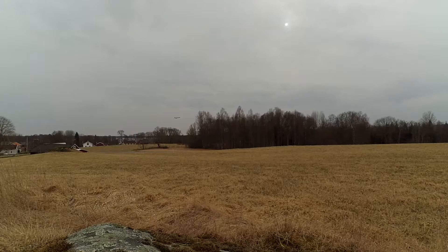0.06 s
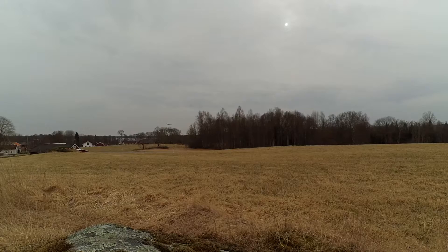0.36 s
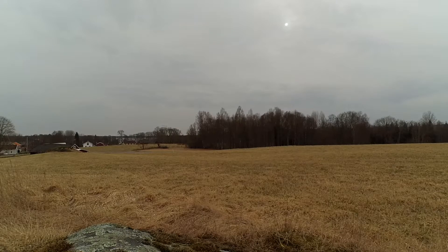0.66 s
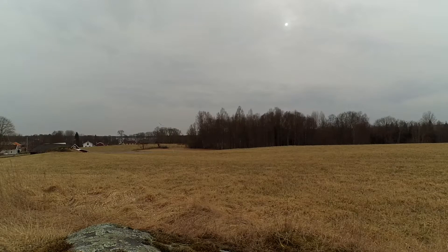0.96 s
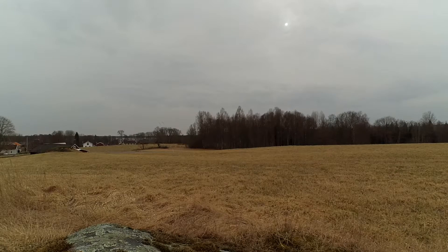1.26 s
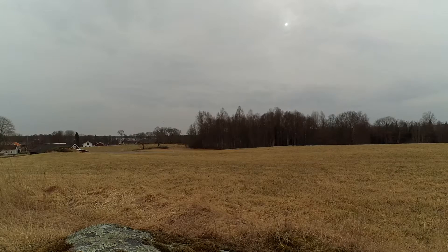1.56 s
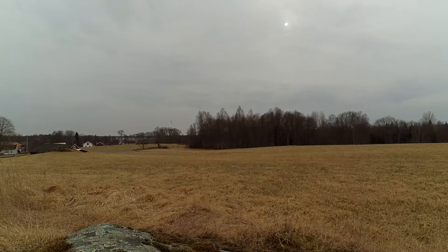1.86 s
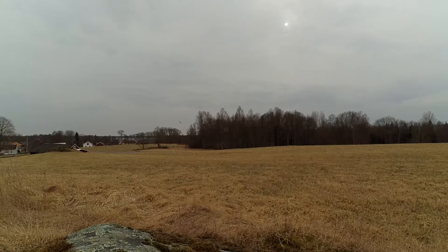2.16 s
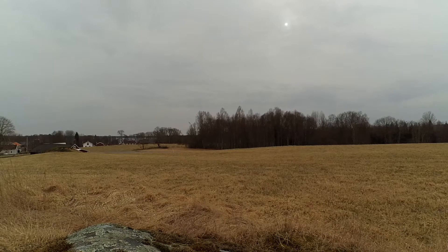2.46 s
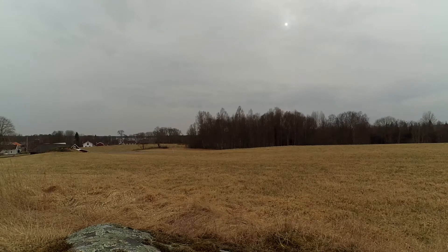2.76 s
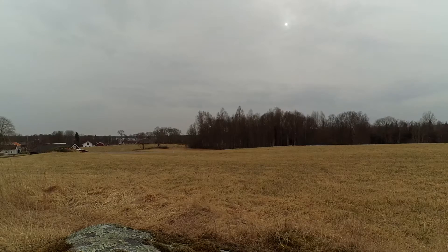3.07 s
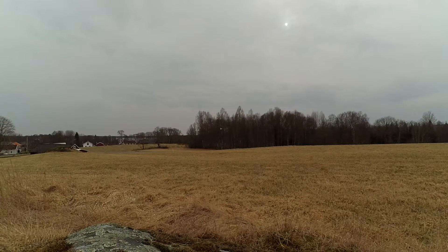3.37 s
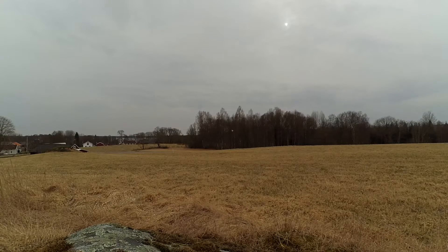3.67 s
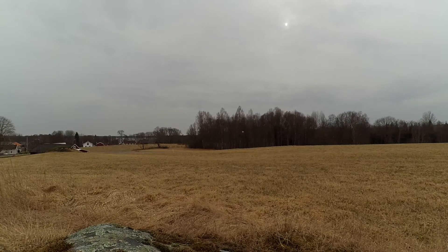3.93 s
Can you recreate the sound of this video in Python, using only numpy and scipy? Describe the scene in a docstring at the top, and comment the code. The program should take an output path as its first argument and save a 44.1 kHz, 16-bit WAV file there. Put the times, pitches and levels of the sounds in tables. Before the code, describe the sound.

Soft wind buffets the microphone over faint ratchet-like ticks and a distant motor drone.

```python
"""Light wind rumbles and bumps on the microphone in a quiet open field.
A far motor drones, slowly sinking in pitch, over a bed of distant air and microphone hiss.
Something close by ticks faintly like a slow ratchet, about eight times a second, its hollow ring rising.
A dull scuff slips past; late on, one sharp click stands out and a faint, thin sizzle creeps in."""
import sys
import numpy as np
from scipy import signal
from scipy.fft import rfft, irfft, next_fast_len
from scipy.io import wavfile
from scipy.ndimage import uniform_filter1d, map_coordinates

SR = 44100
rng = np.random.default_rng(int(sys.argv[2]) if len(sys.argv) > 2 else 0)


def to_wav(s):
    """Save 16-bit WAV."""
    ch = np.atleast_2d(s).T  # columns
    pcm = np.round(np.clip(ch, -1, 1) * 32767)  # PCM
    wavfile.write(sys.argv[1], SR, pcm.astype(np.int16))


N = 176400
TIME = np.arange(N) / SR
RING_TIME = TIME[:SR // 20]

# gusts on the microphone (time [s], strength [dB])
GUSTS = [(0.0, -51), (0.02, -44), (0.09, -63), (0.18, -51), (0.21, -49), (0.26, -50.5), (0.3, -55.5),
         (0.39, -53), (0.42, -58), (0.47, -61), (0.51, -44), (0.58, -62), (0.61, -45), (0.71, -46),
         (0.73, -62), (0.99, -59), (1.31, -49.5), (1.37, -46), (1.39, -47.5), (1.6, -53.5), (1.74, -39.5),
         (1.77, -54.5), (1.8, -39), (1.85, -72), (1.95, -48.5), (1.97, -56), (2.03, -55), (2.44, -62.5),
         (2.49, -54), (2.78, -58), (2.84, -56.5), (2.87, -57), (2.96, -57.5), (3.0, -54), (3.11, -52),
         (3.17, -59.5), (3.36, -45), (3.41, -52), (3.51, -64.5), (3.64, -41), (3.68, -52.5), (3.7, -43),
         (3.99, -62.5), (4.0, -60.5)]
# wind colours: slow pressure sway, deep rumble, gust flutter (frequency [Hz], relative level [dB])
SWAY_SPECTRUM = [(3, -11.5), (7, -1.5), (15, 4), (21, -5.5), (30, -22), (60, -62), (200, -140)]
RUMBLE_SPECTRUM = [(8, -19.5), (18, 0), (30, 2), (47, -7), (70, -22.5), (120, -39), (220, -56), (700, -130)]
FLUTTER_SPECTRUM = [(25, -25.5), (50, 2.5), (80, -1), (120, -11), (180, -25), (300, -42.5), (900, -125)]
# eddies that bump the microphone (time [s], level [dB], width [s])
EDDIES = [(0.172, -39.5, 0.0084), (0.246, -39.5, 0.01), (0.522, -43.5, 0.01), (0.639, -33.5, 0.019),
          (0.699, -34.5, 0.012), (1.3, -37.5, .013), (1.738, -39, 0.0039), (1.797, -37.5, 0.0099),
          (3.026, -49, 0.0058), (3.647, -38.5, 0.0058), (3.708, -40.5, 0.005)]

# the motor's sinking note (time [s], pitch [Hz])
MOTOR_GLIDE = [(0, 174), (.3, 170), (.9, 169.5), (2.1, 169.5), (2.8, 167.5), (3.5, 166.5), (4, 166.5)]
# fades of the motor's fundamental, octave and airy rush (time [s], level [dB])
FUNDAMENTAL_FADE = [(0.0, -79.5), (0.63, -72), (0.69, -85), (0.95, -69.5), (1.37, -66.5), (1.53, -79.5),
                    (1.76, -71), (1.99, -78), (2.07, -73), (2.65, -78.5), (3.51, -69.5), (3.72, -76),
                    (3.92, -69), (4.0, -64)]
OCTAVE_FADE = [(0, -85), (.7, -93.5), (1.3, -86.5), (1.7, -93), (2.1, -86.5), (2.45, -94), (3.0, -84.5),
               (3.3, -89.5), (3.7, -82.5), (4, -80.5)]
RUSH_FADE = [(0, -92), (.8, -94.5), (2.8, -93), (3.4, -85), (3.75, -80), (4, -84)]
# colours of the motor's rush, distant air and microphone hiss (frequency [Hz], relative level [dB])
RUSH_SPECTRUM = [(150, -13), (280, 2.5), (400, -6), (550, -11), (900, -29)]
AIR_SPECTRUM = [(20, 5), (70, 2.5), (130, -3.5), (200, -8.5), (300, -14), (450, -18.5), (1000, -20.5),
                (1600, -26.5), (2400, -26), (4000, -30), (8000, -58)]
HISS_SPECTRUM = [(100, 0.16), (1000, 0.34), (3000, 0.68), (5000, 0.73), (7000, -0.36), (10000, -0.42),
                 (13000, -1), (15000, -0.87)]
# stereo width of wind, air and hiss (frequency [Hz], side against mid [dB])
WIND_WIDTH = [(25, -27.5), (50, -19), (100, -28), (200, -40)]
AIR_WIDTH = [(100, -25), (300, -34.5), (700, -25.5), (2000, -20.5), (5000, -15.5)]
HISS_WIDTH = [(500, -23), (2000, -14.5), (6500, -11), (9300, -11.5), (10200, -35)]

# ratchet-like hits, with layers balanced against the middle mode
# (time [s], level before trim [dB], middle mode [Hz], low modes [dB], high modes [dB], scratch [dB])
TICK_HITS = [(0.2726, -55, 1990, -4, 4, -6), (.374, -56.5, 2050, -5, 3.5, -10),
             (0.4812, -55, 2020, -3, 6.5, -10), (.657, -62.5, 1970, -1, 6, 1),
             (0.8235, -64, 1920, -8, -5, -10), (1.324, -61.5, 1970, -3, -4, -7),
             (1.4367, -59.5, 2000, 1, -2, -9), (1.5474, -60.5, 1930, -5, -18, -12),
             (1.6626, -56.5, 2000, -4, -2, -9), (1.7754, -60.5, 2060, -1, -1, -3),
             (1.893, -59, 1950, -2, -3, -15), (2.019, -61.5, 2250, -7, -4, -12),
             (2.136, -51.5, 2090, -3.5, -3, -15), (2.2568, -58.5, 2100, 1, -4, -16),
             (2.3655, -63, 2000, 2, -16, -23), (2.489, -56.5, 1940, -3.5, -24, -8.5),
             (2.605, -57, 2240, 1, -5, -17), (2.7217, -53.5, 2340, -6, -16, -21),
             (2.8358, -61, 2170, -5, -22, -14), (2.9013, -67.5, 2000, -2, -5.5, -14),
             (2.9714, -64.5, 2180, -3, -9, -14), (3.095, -59.5, 2100, -1.5, -7.5, -17),
             (3.2142, -58, 2400, -1.5, -21, -14), (3.3253, -65, 2530, -15, -20, -25),
             (3.523, -59, 2540, -1, -4, -16), (3.5817, -67, 2300, 0, -12, -16),
             (3.7613, -62.5, 2470, -3.5, -12, -15), (3.811, -65, 2420, 6, 0, -10)]
# the ticking part's ring (starting frequency [Hz], drift [Hz/s], relative level [dB], t60 [s])
TICK_LOW_MODES = [(272, 160, -5, 0.011), (591, 205, 0, 0.018)]
TICK_HIGH_MODES = [(3374, -47, 4, 0.0056), (3070, 17, -4, .008), (4030, 29, -11.5, 0.0073)]
# the scuff's dull colour (frequency [Hz], relative level [dB])
SCUFF_SPECTRUM = [(120, -18), (300, 8), (750, -6), (1100, -32), (3000, -60)]
# the click's bright ring (frequency [Hz], relative level [dB], t60 [s])
CLICK_RING = [(4530, 1, 0.0079), (4230, -12, 0.0026), (5200, -7, .003), (2440, -23, 0.0019)]

# the sizzle's late swell (time [s], level [dB])
SIZZLE_FADE = [(0, -115), (3.3, -107), (3.6, -93), (4, -98)]
# its thin, high colour (frequency [Hz], relative level [dB])
SIZZLE_SPECTRUM = [(4500, -50), (5000, 3), (5150, 3), (5300, -4), (5800, -15)]


def amp(db):
    """Decibels to gain."""
    return 10 ** (np.asarray(db) / 20)


def unit(x):
    """Scale to rms 1."""
    return x / np.sqrt(np.mean(x ** 2) + 1e-20)


def curve(rows):
    """An automation curve through (time [s], value) points."""
    return np.interp(TIME, *np.transpose(rows))


def wobble(rate):
    """Smooth random modulation, rate knots a second."""
    return map_coordinates(rng.standard_normal(256), [TIME * rate], mode="wrap")


def filtered(x, response):
    """Equalise x with a gain that is a function of frequency."""
    size = next_fast_len(N + SR // 2)
    hz = np.fft.rfftfreq(size, 1 / SR)
    return irfft(rfft(x, size) * response(hz), size)[..., :N]


def noise(spectrum, width):
    """Stereo noise of rms 1; its colour and width are (frequency [Hz], level [dB]) points."""
    def gain(points, hz):
        point_hz, db = np.transpose(points)
        return amp(np.interp(np.log(hz + 1), np.log(point_hz + 1), db))

    def mid_side_gains(hz):
        return gain(spectrum, hz) * np.array([np.ones_like(hz), gain(width, hz)])

    mid, side = filtered(rng.standard_normal((2, N)), mid_side_gains)
    return unit(np.array([mid + side, mid - side]))


def steadied(x, samples):
    """Level out the chance swells of a noise over a sliding window."""
    power = uniform_filter1d(np.abs(signal.hilbert(x[0])) ** 2 / 2, samples)
    return x / np.sqrt(np.abs(power) + 0.00061)


def ring(hz, db, t60):
    """One dying mode."""
    return amp(db - 60 * RING_TIME / t60) * np.sin(2 * np.pi * hz * RING_TIME)


def burst(db, t60, band_hz):
    """A dying puff of noise in a band."""
    b, a = signal.butter(2, band_hz, "bandpass", fs=SR)
    puff = signal.lfilter(b, a, rng.standard_normal(len(RING_TIME)))
    return amp(db - 60 * RING_TIME / t60) * unit(puff)


def add(track, start_s, sound):
    """Mix a sound into the track."""
    part = track[round(start_s * SR):][:len(sound)]
    part += sound[:len(part)]


def wind(typical_gust_db=-47.5):
    """Over a slow sway, gusts drive a rumble and, more steeply, a flutter; eddies bump on top."""
    gust_db = curve(GUSTS) - typical_gust_db
    sway = amp(-49.5) * steadied(noise(SWAY_SPECTRUM, WIND_WIDTH), samples=8000)
    rumble = amp(-46 + 1.01 * gust_db) * steadied(noise(RUMBLE_SPECTRUM, WIND_WIDTH), samples=3000)
    flutter = amp(-61.5 + 1.25 * gust_db) * steadied(noise(FLUTTER_SPECTRUM, WIND_WIDTH), samples=2000)
    bumps = np.zeros(N)
    for centre_s, db, width_s in EDDIES:
        offset = (TIME - centre_s) / width_s
        bumps += amp(db) * np.pi * offset / (1 + offset ** 2) ** 2  # one swing of pressure
    return sway + rumble + flutter + bumps


def motor(wander_hz=1.1, flicker_db=1.23):
    """A far drone, its octave and a soft rush, fading in and out on the moving air."""
    pitch_hz = curve(MOTOR_GLIDE) + wander_hz * wobble(12)
    phase = 2 * np.pi * np.cumsum(pitch_hz) / SR
    fundamental = amp(curve(FUNDAMENTAL_FADE) + flicker_db * wobble(20)) * np.sin(phase)
    octave = amp(curve(OCTAVE_FADE) + flicker_db * wobble(18)) * np.sin(2 * phase)
    rush = amp(curve(RUSH_FADE)) * noise(RUSH_SPECTRUM, AIR_WIDTH)
    return np.sqrt(2) * (fundamental + octave) + rush


def distant_air(level_db=-70, sway_db=0.55):
    """A dark bed of far-off air, gently breathing."""
    return amp(level_db + sway_db * wobble(3)) * noise(AIR_SPECTRUM, AIR_WIDTH)


def microphone_hiss(level_db=-77.5):
    """The microphone's own even, nearly white noise."""
    return amp(level_db) * noise(HISS_SPECTRUM, HISS_WIDTH)


def ticks(trim_db=-1.24, attack_s=0.00022, delay_s=0.0005):
    """Every tick scratches and briefly rings the same hollow part, whose low modes climb with time."""
    track = np.zeros(N)
    for start_s, db, middle_hz, low_db, high_db, scratch_db in TICK_HITS:
        tick = ring(middle_hz, db=0, t60=0.012)
        tick += ring(1.157 * middle_hz, db=-3, t60=0.012)  # a weaker partner just above
        tick += burst(scratch_db, t60=0.026, band_hz=(1330, 5400))
        for modes, layer_db in ((TICK_LOW_MODES, low_db), (TICK_HIGH_MODES, high_db)):
            for hz, drift, mode_db, t60 in modes:
                detune = 1 + rng.normal(0, 0.034)
                tick += ring((hz + drift * start_s) * detune, mode_db + layer_db, t60)
        tick *= 1 - np.exp(-RING_TIME / attack_s)
        add(track, start_s + delay_s, amp(db + trim_db) * tick / np.abs(tick).max())
    return track


def scuff(centre_s=1.298, width_s=0.0068, level_db=-68):
    """A short, dull rub on the camera body, a little different left and right."""
    swell = np.exp(-((TIME - centre_s) / width_s) ** 2 / 2)
    return amp(level_db) * swell * noise(SCUFF_SPECTRUM, width=[(1, -14)])


def click(start_s=3.2765, gain_db=-38.5, attack_s=0.00008):
    """A small hard part snaps once with a soft thud and rings for a few milliseconds."""
    ping = sum(ring(*mode) for mode in CLICK_RING)
    snap = burst(db=-7, t60=0.0018, band_hz=(300, 8700))
    thud = burst(db=-32, t60=0.016, band_hz=(240, 830))
    attack = 1 - np.exp(-RING_TIME / attack_s)
    track = np.zeros(N)
    add(track, start_s, amp(gain_db) * (ping + snap + thud) * attack)
    return track


def sizzle(flicker_db=3.2):
    """A thin, flickering band of treble that creeps in near the end."""
    return amp(curve(SIZZLE_FADE) + flicker_db * wobble(30)) * noise(SIZZLE_SPECTRUM, AIR_WIDTH)


def scene():
    """All layers, close to the centre."""
    return wind() + motor() + distant_air() + microphone_hiss() + ticks() + scuff() + click() + sizzle()


def record(dry, top_hz=15250):
    """A brick-wall high cut on the whole mix."""
    return filtered(dry, lambda hz: hz < top_hz)


dry = scene()
out = record(dry)
to_wav(out)
```